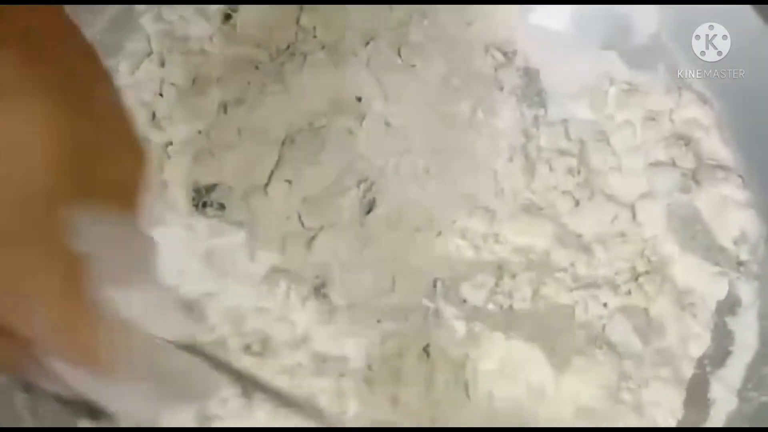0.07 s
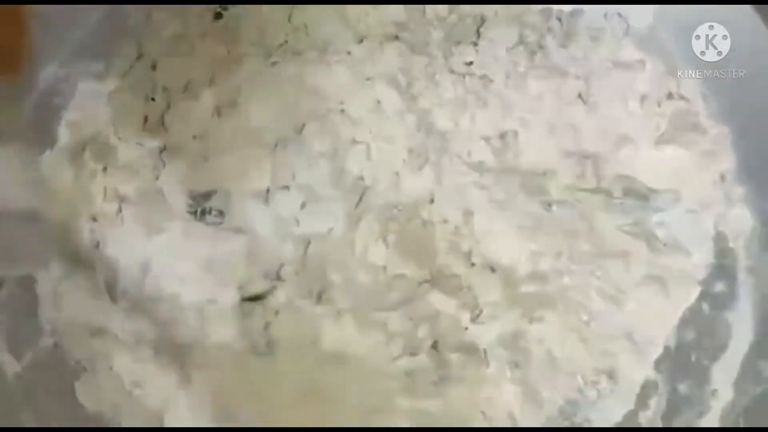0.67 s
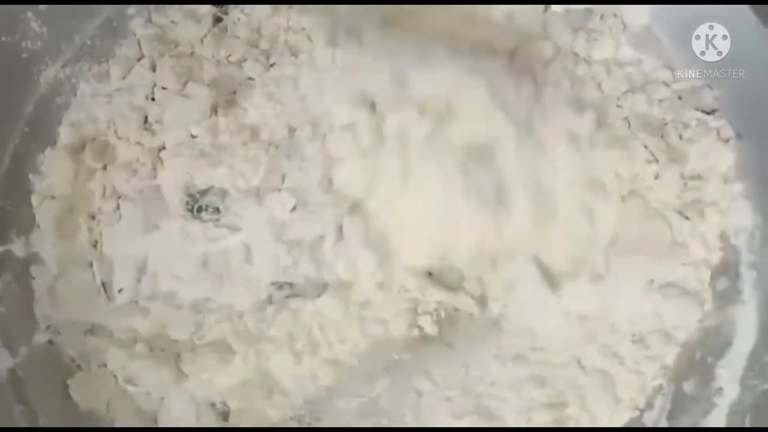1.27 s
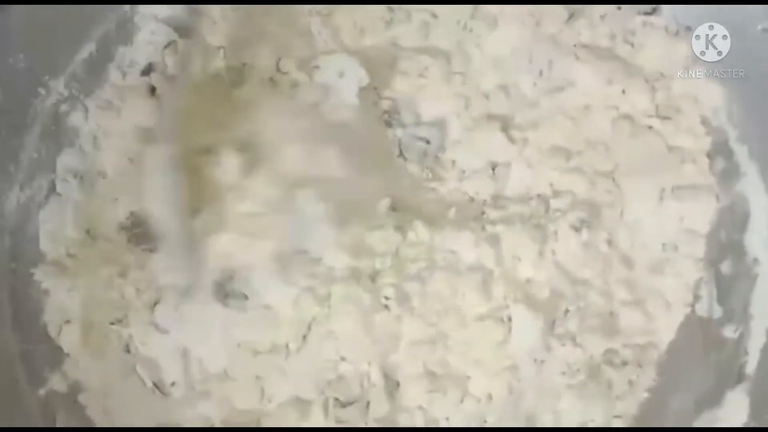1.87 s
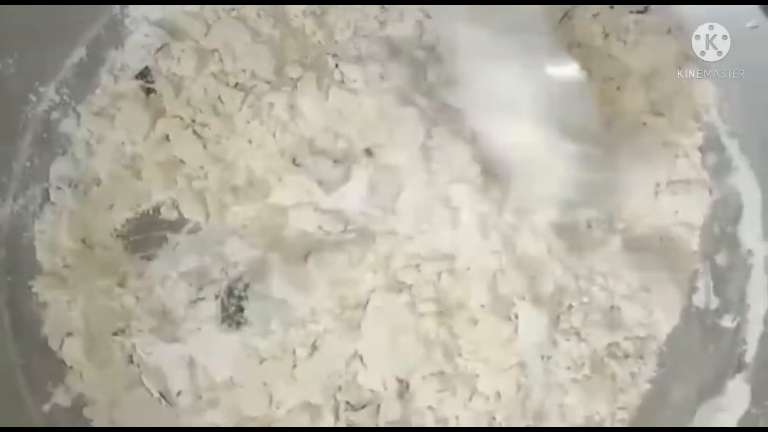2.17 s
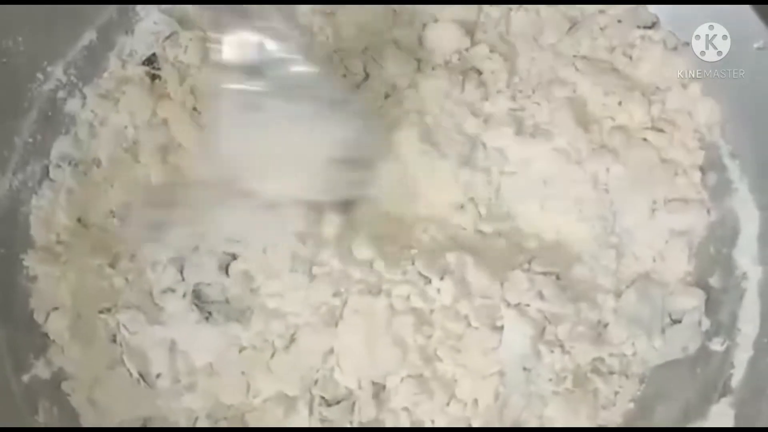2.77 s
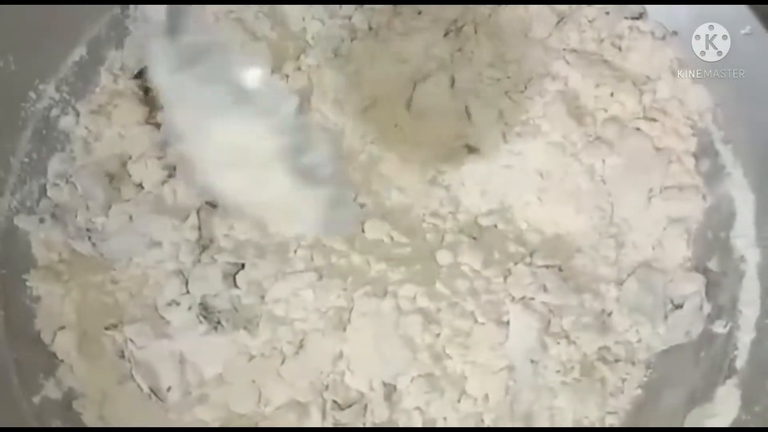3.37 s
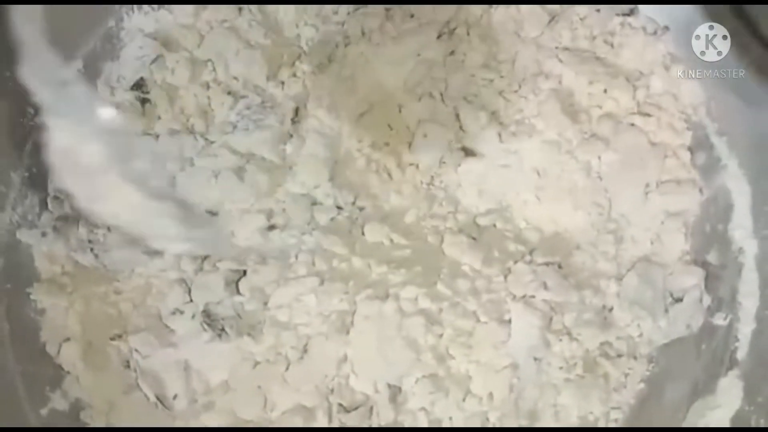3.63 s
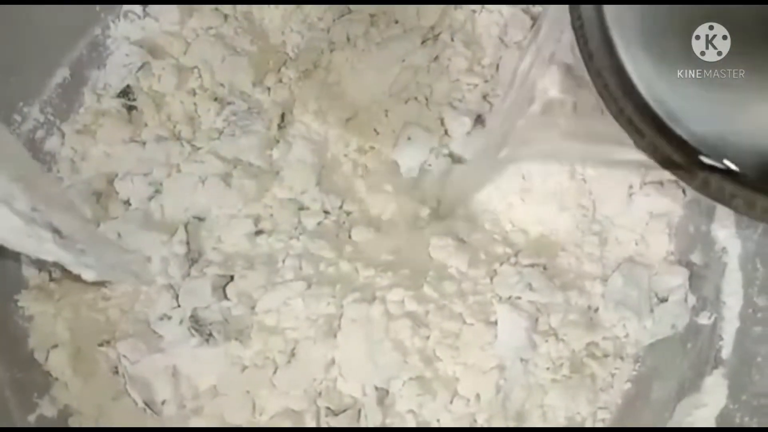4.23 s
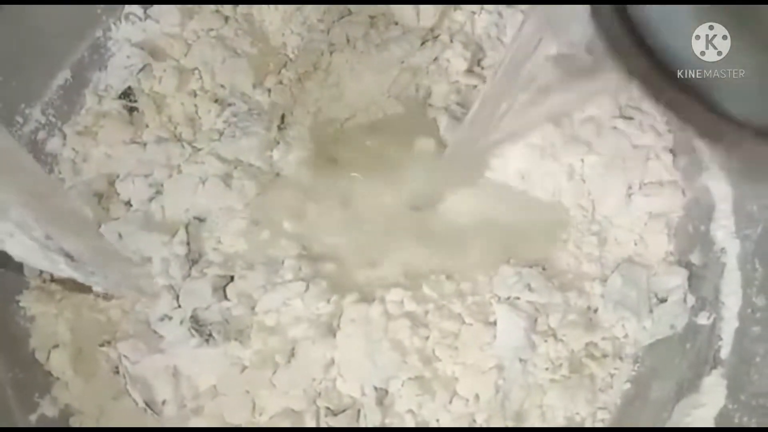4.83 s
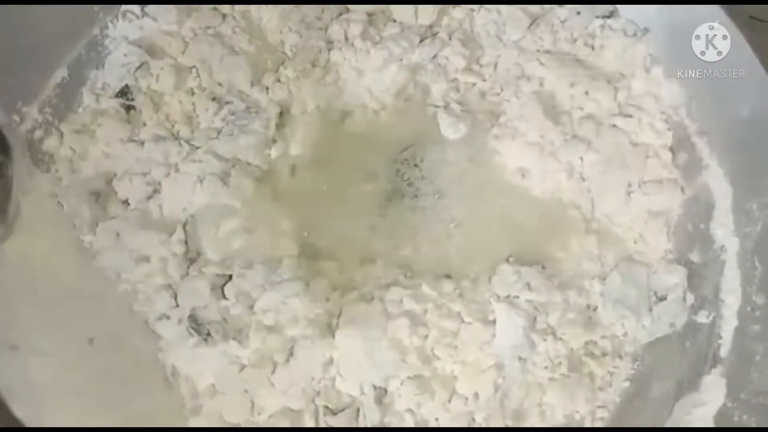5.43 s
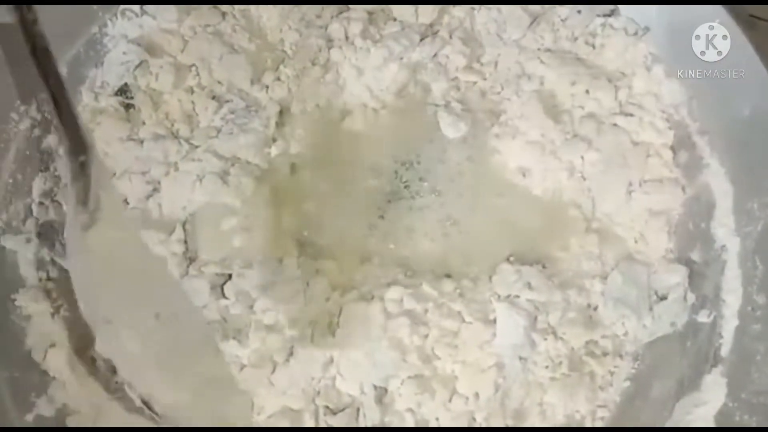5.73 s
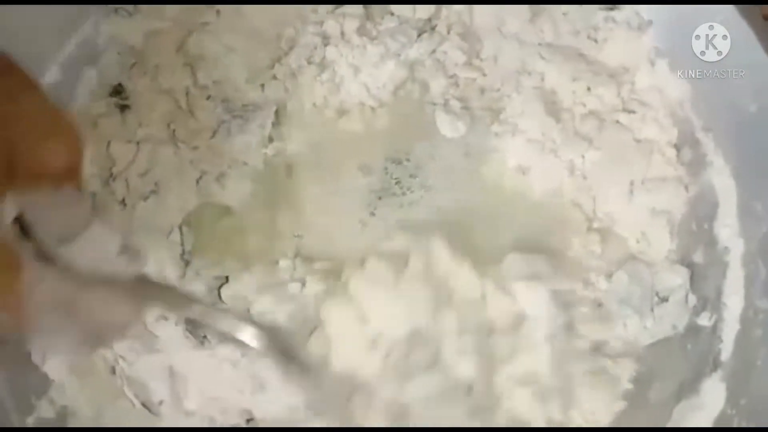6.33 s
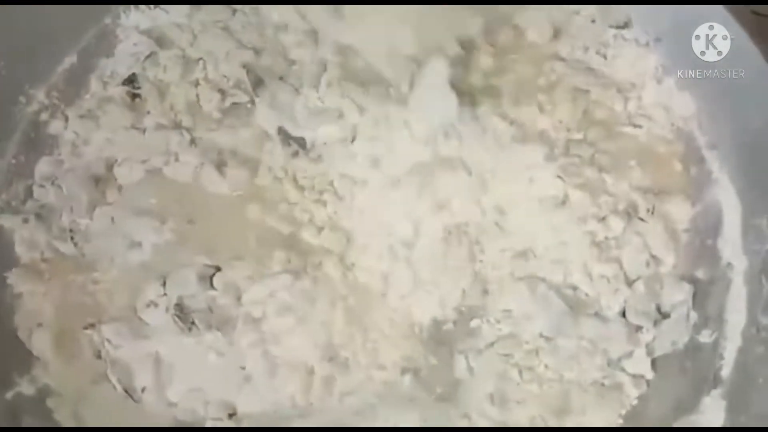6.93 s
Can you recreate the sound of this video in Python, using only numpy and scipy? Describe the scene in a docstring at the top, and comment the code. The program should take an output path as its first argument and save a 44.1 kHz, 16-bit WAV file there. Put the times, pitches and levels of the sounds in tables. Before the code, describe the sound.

Short, dry scrapes and dull knocks come from a ladle stirring flour in a metal bowl, with an occasional bright tink. A gentle pour of water follows for about two seconds, pattering and gurgling while the kettle's hollow rings high. Then comes the loudest sound, the steel kettle clanking down and rattling to rest, before a little more scraping. Everything is heard up close in a quiet, small kitchen.

```python
"""Hot water into a bowl of flour

A steel ladle scrapes through flour in a metal bowl, close by, in a small kitchen.
Hot water runs from a kettle, whose hollow sings with the stream, and splashes softly into the flour.
The kettle is set down with a loud ringing knock and a rattle, and the ladle digs in again."""
import sys
import numpy as np
from scipy import signal
from scipy.fft import rfft, irfft, next_fast_len
from scipy.io import wavfile
from scipy.ndimage import uniform_filter1d

SR = 44100
rng = np.random.default_rng(int(sys.argv[2]) if len(sys.argv) > 2 else 0)


def generate_wav(signal):
    """Clip the signal to [-1, 1] and save it as 16-bit WAV at the path in sys.argv[1]."""
    frames = np.transpose(np.atleast_2d(signal))
    scaled = np.clip(frames, -1, 1) * 32767
    pcm = np.round(scaled).astype(np.int16)
    wavfile.write(sys.argv[1], SR, pcm)


N = 308611
TIME = np.arange(N) / SR

# tone of the flour-damped bowl: freq_hz, level_db
BOWL_SPECTRUM = [(40, -50.5), (100, -42), (220, -39), (400, -18.5), (540, -11.5), (850, -7), (1150, 5.5),
                 (1600, 1), (2100, -7), (3400, -1.5), (4150, -11), (5100, 0), (6800, -5), (9200, -21),
                 (15000, -14.5)]
# envelope of the water landing in the flour: time_s, level_db
POUR = [(4.08, -72.5), (4.38, -58), (4.56, -58), (4.75, -50.5), (5.03, -48), (5.2, -43), (5.33, -59.5),
        (5.55, -47), (5.68, -63)]
POUR_START_S, POUR_END_S = POUR[0][0], POUR[-1][0]


def amp(db):
    """Decibels to gain."""
    return 10 ** (np.asarray(db) / 20)


def unit(x):
    """Scales to rms 1."""
    return x / np.sqrt(np.mean(x ** 2) + 1e-20)


def value_at(points, hz):
    """Reads (freq_hz, value) points on a log-frequency axis."""
    freqs, values = np.transpose(points)
    return np.interp(np.log(hz + 1), np.log(freqs + 1), values)


def add(mix, start_s, sound):
    """Drops a sound into the mix."""
    part = mix[max(round(start_s * SR), 0):][:len(sound)]
    part += sound[:len(part)]


def colour(x, spectrum):
    """Equalises x with a spectrum, at rms 1."""
    gain = amp(value_at(spectrum, np.fft.rfftfreq(len(x), 1 / SR)))
    return unit(irfft(rfft(x) * gain, len(x)))


def noise(spectrum, size=N):
    """Noise of a given spectrum, at rms 1."""
    return colour(rng.standard_normal(next_fast_len(size)), spectrum)[:size]


def band(x, low_hz, high_hz):
    """Band-pass with soft edges."""
    size = next_fast_len(len(x))
    hz = np.fft.rfftfreq(size, 1 / SR) + 1
    return irfft(rfft(x, size) / (1 + (low_hz / hz) ** 10) / (1 + (hz / high_hz) ** 10), size)[:len(x)]


def resonate(x, hz, width_hz):
    """A resonance of gain 1 that may follow a pitch curve."""
    turn = np.exp(2j * np.pi * np.cumsum(hz * np.ones(N)) / SR)
    pole = np.exp(-np.pi * width_hz / SR)
    return 2 * (turn * signal.lfilter([1 - pole], [1, -pole], x / turn + 1e-18)).real


def ring(modes, t):
    """Decaying sines after one blow."""
    return sum(amp(db - 60 * t / t60) * np.sin(2 * np.pi * hz * t) for hz, db, t60 in modes)


def wander(per_s):
    """A slow random curve of rms 1."""
    knots = np.arange(0, TIME[-1] + 1, 1 / per_s)
    return unit(np.interp(TIME, knots, rng.standard_normal(N)[:len(knots)]))


def envelope(points):
    """Gain curve through (time_s, level_db) points, fading to silence outside them."""
    times, db = np.transpose(points)
    gate = np.interp(TIME, [times[0] - 0.006, times[0], times[-1], times[-1] + 0.035], [0, 1, 1, 0])
    return amp(np.interp(TIME, times, db)) * gate


def held(start_s, hold_s, db, rise_s, fade_db_per_s):
    """Gain curve that rises, holds and fades evenly."""
    fading_s = np.maximum(TIME - start_s - rise_s - hold_s, 0)
    return np.clip((TIME - start_s) / rise_s, 0, 1) * amp(db - fade_db_per_s * fading_s)


def grains(per_s, spread_db):
    """Random clicks of uneven size."""
    sizes = rng.standard_normal(N) * amp(spread_db * np.minimum(rng.exponential(1, N), 4))
    return unit(sizes * (rng.random(N) < per_s / SR))


def patchy(x, spread_db):
    """Lets narrow bands swell and fade on their own, about 130 Hz by 80 ms at a time."""
    frames = signal.stft(x, nperseg=1024, noverlap=768)[2]
    swells = uniform_filter1d(rng.standard_normal(frames.shape), size=14, axis=1)
    patches = unit(uniform_filter1d(swells, size=3, axis=0))
    return unit(signal.istft(frames * amp(spread_db * patches), nperseg=1024, noverlap=768)[1][:N])


def in_flour(sound, force, drag, depth, low_hz=680, high_hz=2100):
    """Three-band balance: force sets the hiss, drag the mids and depth in the flour the bass."""
    bass, mids = band(sound, 0.86, low_hz), band(sound, low_hz, high_hz)
    hiss = sound - bass - mids
    return (force * hiss / band(sound, 3000, 8000).std()
            + drag * mids / band(sound, 900, 1800).std()
            + depth * bass / band(sound, 250, 600).std())


def room_tone():
    """A very quiet, gently shifting bed of noise."""
    # the bed's tone: freq_hz, level_db
    spectrum = [(30, -13.5), (90, 2), (200, 4), (450, -10.5), (800, -6), (1300, -2.5), (2000, -15),
                (4200, -17), (5200, -15), (6700, 2), (8000, -10.5), (10000, -15.5), (15000, -26.5)]
    return amp(-71) * patchy(noise(spectrum), spread_db=5.5)


def kitchen_reverb(x, gap_s=0.0035):
    """Dense reflections from hard walls, each band dying at its own speed."""
    # the room's decay: freq_hz, t60_s
    decay = [(100, 0.64), (500, 0.21), (1500, 0.33), (5000, 0.35), (9000, 0.27), (15000, 0.27)]
    hz, t, frames = signal.stft(rng.standard_normal(SR), SR, nperseg=256)
    tail = signal.istft(frames * amp(-60 * t / value_at(decay, hz)[:, None]), SR, nperseg=256)[1]
    tail *= np.clip(np.arange(len(tail)) / SR / gap_s - 1, 0, 1)
    return signal.fftconvolve(x, tail / np.linalg.norm(tail))[:N]


def counter_rumble():
    """Low rumble through the counter as the bowl is nudged, water runs in and the kettle lands."""
    # low bumps and the kettle's boom: start_s, hold_s, level_db
    bumps = [(0, 0.034, -61), (.25, 0.15, -65.5), (.83, 0.08, -51.5), (1.39, 0.14, -60),
             (2.13, 0.062, -63.5), (2.75, 0.038, -60), (5.2, 0.12, -64), (5.72, 0.15, -41),
             (6.3, 0.48, -61)]
    # tone of the rumble: freq_hz, level_db
    spectrum = [(25, -23), (50, -17.5), (72, -7.5), (88, 3), (120, -13.5), (152, 1), (185, -15),
                (215, -13.5), (350, -25), (900, -55.5)]
    stream = (POUR_START_S, POUR_END_S - POUR_START_S, -66)
    gain = sum(held(*event, rise_s=0.028, fade_db_per_s=69) for event in bumps + [stream])
    return amp(-4.5) * gain * noise(spectrum)


def aftertone():
    """A faint tone lingers after the hardest stroke."""
    # one narrow peak: freq_hz, level_db
    spectrum = [(600, -67), (770, -7), (808, 3.5), (850, -20.5), (1050, -69)]
    return held(start_s=0.96, hold_s=0.55, db=-71, rise_s=0.057, fade_db_per_s=77.5) * noise(spectrum)


def soft_hiss(hz=2710, width_hz=230):
    """A soft, wavering band of hiss, heard until the water runs."""
    hiss = resonate(resonate(rng.standard_normal(N), hz, width_hz), hz, width_hz)
    gain = held(start_s=2.634, hold_s=1.4, db=-62, rise_s=0.2, fade_db_per_s=157)
    return gain * unit(hiss * amp(3.3 * wander(per_s=20)))


def simmer():
    """Hot water seethes quietly in the kettle."""
    # the simmer's envelope: time_s, level_db
    swell = [(2.6, -81), (2.9, -66), (3.85, -61), (4.2, -54), (6.2, -52), (7, -77.5)]
    # its tone: freq_hz, level_db
    spectrum = [(200, -16.5), (560, -15), (900, -18), (1200, -9.5), (1400, 4), (1600, -9), (2150, -10.5),
                (3100, -10), (4500, -20), (5600, -8.5), (7400, -14), (10000, -44.5)]
    return envelope(swell) * patchy(noise(spectrum), spread_db=6.5)


def kettle_song(steadiness=0.37):
    """The stream at the spout excites narrow air resonances of the kettle's hollow."""
    # air resonances: pitch_hz, width_hz, level_db
    hollow = [(2400, 31, -36), (2848, 26, -8), (3330, 28.3, -0.5), (3790, 30, -20), (4290, 24, -17.5),
              (4780, 28, -27.5), (5220, 56, -24.5), (5750, 54, -27.5), (8530, 70, -30), (9000, 70, -31.5),
              (9610, 70, -32)]
    # the song's envelope: time_s, level_db
    swell = [(3.89, -65), (3.95, -54), (4.05, -40.5), (4.12, -39), (4.19, -44), (4.76, -35.5), (4.8, -30),
             (4.88, -28), (4.91, -34.5), (4.96, -33), (5.0, -39.5), (5.11, -33), (5.26, -34.5),
             (5.32, -42.5), (5.5, -30), (5.68, -44)]
    size = next_fast_len(N)
    hz = np.fft.rfftfreq(size, 1 / SR)
    peaks = sum(amp(db) / np.sqrt(width) / (1 + ((hz - pitch) / width) ** 2)
                for pitch, width, db in hollow)
    air = np.fft.ifft(peaks * rfft(rng.standard_normal(size)), size)[:N]
    loudness = np.sqrt(uniform_filter1d(abs(air) ** 2, size=1200))
    evened = unit(air.real / loudness ** steadiness)  # a steady stream feeds them evenly
    return amp(0.34) * envelope(swell) * evened


def gurgles(per_pitch=24, cycles=16, glide=0.071, spread_db=4):
    """Air pockets of many sizes ring briefly in the puddle, rising a little in pitch."""
    out = np.zeros(N)
    for hz in np.geomspace(330, 2100, num=22):
        age = np.arange(int(4 * cycles * SR / hz)) * hz / SR / cycles
        chirp = np.sin(2 * np.pi * cycles * age * (1 + glide * age / 2))
        bubble = chirp * np.exp(-2 * age) * (1 - np.exp(-20 * age))
        for when, chance in rng.random((per_pitch, 2)):
            add(out, when * TIME[-1], amp(spread_db * min(-np.log(chance), 3)) * bubble)
    return unit(out)


def splashes():
    """Water patters into soft flour and gurgles in the puddle; a few drops stand out."""
    # tone of the splash: freq_hz, level_db
    spectrum = [(100, -45.5), (300, -24.5), (480, 9), (750, -1.5), (1350, 11.5), (1900, 1.5), (2600, 9),
                (4500, -7.5), (5500, -2.5), (7000, -2.5), (8500, -13), (11500, -17), (15000, -9)]
    # single drops and gulps: start_s, level_db, band_hz, t60_s
    drops = [(4.401, -36.5, 5200, 0.036), (4.73, -30.5, 4700, 0.031), (4.9, -32.5, 4260, 0.036),
             (5.045, -30, 3540, 0.0084), (5.147, -42, 1400, 0.04), (5.175, -33, 7100, 0.024),
             (5.209, -35, 5200, 0.019), (5.228, -44, 1320, 0.057)]
    patter = grains(per_s=950, spread_db=-1.5) * amp(2 * wander(per_s=61))
    spray = colour(patter, spectrum)
    body = band(spray, 1, 2100)
    puddle = patchy(body, spread_db=5.5) * body.std()
    landing = band(spray, 2680, SR) + amp(-1) * puddle + amp(-13) * gurgles()
    out = amp(-2.5) * envelope(POUR) * in_flour(landing, force=0.95, drag=amp(-2), depth=amp(-11))
    t = np.arange(SR // 8) / SR
    for start_s, db, hz, t60 in drops:
        splat = unit(band(rng.standard_normal(len(t)), hz / 2.3, hz * 1.56))
        add(out, start_s, amp(db - 60 * t / t60) * splat)
    return out


def ladle_tinks(shimmer_t60_s=0.11, rise_s=0.0015):
    """Light touches ring only the steel's highest modes; laid against the wall, the ladle clinks."""
    # steel touches steel: start_s, level_db
    touches = [(.003, -39), (0.764, -43.5), (1.338, -49), (2.727, -43), (2.752, -23.5), (2.786, -50),
               (5.549, -31), (5.575, -49)]
    # their shimmer: freq_hz, level_db
    spectrum = [(4200, -37), (4900, -8), (5600, -15), (8200, -17.5), (9500, -7), (11500, -26),
                (13800, -9.5), (14700, 3.5), (15600, -3)]
    # their ring: pitch_hz, level_db, t60_s
    high_modes = [(4950, -19.5, 0.13), (12980, -18, .2), (14650, -6, .09)]
    # the ladle's own ring: pitch_hz, level_db, t60_s
    ladle_modes = [(3550, -5, 0.45), (3612, 7, 0.13), (5630, -4, 0.46), (6020, -18, 0.16)]
    out, t = np.zeros(N), np.arange(SR // 2) / SR
    attack = 1 - np.exp(-t / rise_s)
    for (start_s, db), detune in zip(touches, rng.uniform(0.92, 1.015, len(touches))):
        shimmer = noise(spectrum, size=len(t)) * amp(-60 * t / shimmer_t60_s)
        add(out, start_s, amp(db) * attack * (shimmer + ring(high_modes, t * detune)))
    add(out, start_s=2.938, sound=amp(-32.5) * ring(ladle_modes, t))
    return out


def bowl_resonance(x, pocket_width_hz=220):
    """The bowl's narrow modes and the air pocket under the ladle colour the scrapes and digs."""
    # the air pocket changes as the ladle turns: time_s, pitch_hz, level_db
    pocket_path = [(0, 1160, 8.5), (.7, 1150, 2), (0.828, 1603, 5.5), (1.002, 1600, -22), (1.4, 1164, -0.5),
                   (3.0, 1360, -26), (6.6, 1140, -7.5)]
    # modes that stand out of the bowl's dense ring: pitch_hz, width_hz, level_db
    modes = [(554, 3.5, -1), (780, 5.7, -1.5), (1180, 5.5, -7.5), (1277, 16, -6.5), (1567, 6.7, -6),
             (3390, 14, -2.5), (4700, 18, -3.5)]
    times, pocket_hz, pocket_db = np.transpose(pocket_path)
    pocket = resonate(x, np.interp(TIME, times, pocket_hz), pocket_width_hz)
    pocket *= amp(np.interp(TIME, times, pocket_db))
    metal = sum(amp(db) * signal.lfilter(*signal.iirpeak(hz, hz / width, SR), x)
                for hz, width, db in modes)
    return x - 0.76 * band(x, 900, 1600) + pocket + metal


def stroke_gains(bite_s=0.002, heap_db_per_s=19, heap_s=0.25, firm_db=-24.5, fizz_db_per_db=0.32):
    """The ladle bites, pushes and slows to rest; returns the gain curves force, drag, depth, fizz."""
    # ladle strokes: start_s, rise_s, hold_s, force_db, swell_db, drag_db, depth_db
    strokes = [(0, .07, .04, -60.5, 5.5, -21, -29.5), (0.118, .19, .13, -27.5, 25.5, -6.5, -12),
               (0.841, 0.085, 0.0088, -21.5, 10.5, 2.5, -29.5), (1.318, .15, 0.049, -38.5, 43, -4.5, -37),
               (1.935, 0.13, 0.032, -46, 33, -7.5, -29), (2.207, 0.032, 0.011, -65.5, 8.5, -2.5, -10.5),
               (2.38, 0.022, .02, -69, 6.5, 4.5, -18), (2.788, 0.12, 0.065, -47, 18, -12, -21),
               (2.942, 0.044, 0.024, -29.5, 6, -15, -27), (3.231, 0.063, .02, -51.5, 21, -8, -45),
               (6.2, 0.2, 0.11, -42.5, 19, -2.5, -17.5), (6.546, 0.049, 0.0022, -35, 14, 6.5, -14),
               (6.777, .1, 0.066, -60.5, -4, -19, -16)]
    gains = np.zeros((4, N))
    for start_s, rise_s, hold_s, force_db, swell_db, drag_db, depth_db in strokes:
        rise_left = np.clip(1 - (TIME - start_s) / rise_s, 0, 1)
        force = held(start_s, rise_s + hold_s, force_db, bite_s, fade_db_per_s=192.5)
        force *= amp(-swell_db * rise_left ** 2)
        # flour heaps up ahead of the ladle, so drag and depth grow through the stroke
        heaped = force * amp(heap_db_per_s * np.clip(TIME - start_s - rise_s, -heap_s, heap_s))
        # dry flour fizzes more under a lighter stroke; the fizz dies first as the ladle slows
        fizz_db = fizz_db_per_db * max(firm_db - force_db, 0) * (start_s < POUR_START_S)
        fizz = force * held(start_s, rise_s + hold_s, fizz_db, bite_s, fade_db_per_s=45)
        gains += [force, heaped * amp(drag_db), heaped * amp(depth_db), fizz]
    return gains


def ladle_scrapes(fizz_hz=9200):
    """Tiny slips of the ladle, bunched by stick and slip, excite the flour-damped bowl."""
    slips = grains(per_s=7000, spread_db=-0.5) * amp(1.1 * wander(per_s=130))
    scrape = colour(slips, BOWL_SPECTRUM)
    force, drag, depth, fizz = stroke_gains()
    top = band(scrape, fizz_hz, SR) / band(scrape, 3000, 8000).std()
    return amp(-5) * (in_flour(scrape, force, drag, depth) + (fizz - force) * top)


def ladle_digs(lowest_hz=400):
    """Blunt blows of the ladle: the bowl's dense modes die quickly under the flour."""
    # blows through the flour: start_s, level_db, mids_db, bass_db, t60_s
    digs = [(0.129, -45, 3, 15.5, 0.22), (0.227, -29.5, 2, 1, .035), (0.246, -32.5, 12, 1.5, 0.064),
            (.292, -26.5, 5.5, 5.5, 0.098), (.355, -26.5, 16.5, 4, 0.044), (0.383, -33, 6.5, 11.5, 0.032),
            (0.414, -27, 9.5, 15.5, 0.057), (.8355, -23.5, 10.5, -9, 0.07), (.8432, -24, -8, -9, .012),
            (.918, -18.5, -8.5, -14.5, 0.32), (1.383, -42.5, -1.5, -21, 0.16),
            (2.003, -55, -17, -9.5, 0.042), (2.233, -53, 9, 2, 0.056), (2.937, -24, 5, 10.5, 0.15),
            (6.585, -33, 4, -8, 0.084)]
    out, t = np.zeros(N), np.arange(SR // 2) / SR
    for start_s, db, mids_db, bass_db, t60 in digs:
        body = noise(BOWL_SPECTRUM, size=len(t))
        body += (amp(mids_db) - 1) * band(body, 570, 1500) + (amp(bass_db) - 1) * band(body, 0.6, 670)
        add(out, start_s, amp(db - 60 * t / t60) * body)
    return band(out, lowest_hz, SR)  # the blows carry no deep bass


def kettle_knocks(rise_s=0.0014, thud_t60_s=0.13, thud_fade_db_per_s=68, settle_s=5.776, choke_db=-9):
    """Each blow gives a clack, a thud of the counter and the shell's ring; returns (blows, ringing)."""
    # the kettle lands, rocks and rattles: start_s, level_db, edge_db, ring_db, clack_t60_s
    knocks = [(5.6885, -7.5, -6, -7.5, 0.023), (5.691, -8.5, 0, -3.5, 0.054), (5.778, -14, -3.5, -2, 0.097),
              (5.805, -21, 9, -41, 0.072), (5.831, -21.5, 2, -9.5, 0.1), (5.848, -24.5, 17, -8, 0.027),
              (5.875, -26, 8, -28, 0.062), (5.92, -34.5, 3.5, -9, 0.74), (5.985, -25.5, 9, -33, 0.066),
              (6.0, -16.5, 6.5, -20, 0.04), (6.052, -14.5, 7.5, -26.5, 0.056), (6.116, -36, 3, -33, 0.18),
              (6.242, -34, 3, -36, 0.05)]
    # tone of a blow: freq_hz, level_db
    spectrum = [(40, -37), (90, -17.5), (160, -5), (300, -6.5), (520, 1.5), (900, -6.5), (1200, -13),
                (1600, -13), (2700, -12), (3400, -1), (3950, -8), (5500, 7.5), (7200, -1), (8800, -12),
                (15000, -12.5)]
    # the kettle's steel shell: pitch_hz, level_db, t60_s
    shell_modes = [(538, -19.5, 0.68), (1646, -36, 0.84), (2243, -13.5, 0.72), (2299, -5, 0.51),
                   (3440, 1.5, 0.14), (3367, -8.5, 0.76), (3460, -9, 0.4), (3466, -12, 0.6),
                   (4530, -13.5, 0.33), (5200, -37, 0.43), (5200, -26, .4), (5800, -24, .45),
                   (6540, -32, 0.6), (7280, -18, 0.27)]
    blows, ringing, t = np.zeros(N), np.zeros(N), np.arange(SR) / SR
    attack = 1 - np.exp(-t / rise_s)
    for start_s, db, edge_db, ring_db, t60 in knocks:
        body = noise(spectrum, size=len(t))
        lows, edge = band(body, 0.93, 1160), band(body, 8000, SR)
        clack = (body - lows + (amp(edge_db) - 1) * edge) * amp(db - 60 * t / t60)
        # the counter takes the kettle's weight, so each thud is weaker than the last
        thud_db = -13.5 - thud_fade_db_per_s * (start_s - knocks[0][0])
        thud = lows * amp(thud_db - 60 * t / thud_t60_s)
        add(blows, start_s, attack * (clack + thud))
        add(ringing, start_s, amp(db + ring_db) * attack * ring(shell_modes, t))
    settled = np.clip((TIME - settle_s) / 0.01, 0, 1)  # dropping flat chokes the modes of the base
    return blows, ringing + (amp(choke_db * settled) - 1) * band(ringing, 1300, 3340)


def scene():
    """Ladle, water and kettle in the kitchen, over quiet room tone, in mono."""
    scrapes = bowl_resonance(ladle_scrapes())
    digs = bowl_resonance(ladle_digs())
    tinks = ladle_tinks()
    water = splashes() + simmer()
    blows, ringing = kettle_knocks()
    send = amp(-11) * scrapes + amp(-1.5) * digs + amp(-1) * tinks + amp(-2.5) * blows + amp(-3) * water
    reverb = kitchen_reverb(send)
    background = room_tone() + counter_rumble() + aftertone() + soft_hiss()
    return (background + reverb + water + kettle_song() + scrapes + digs + tinks + blows + ringing)[None]


def record(dry, low_cut_hz=58, high_cut_hz=15750):
    """The small microphone loses the deepest bass; a steep low-pass trims the very top."""
    thin = signal.sosfilt(signal.butter(3, low_cut_hz, "highpass", fs=SR, output="sos"), dry)
    low_pass = signal.firwin(401, high_cut_hz, window=("kaiser", 8), fs=SR)
    return signal.oaconvolve(thin, low_pass[None], "same")


dry = scene()
out = record(dry)
generate_wav(out)
```